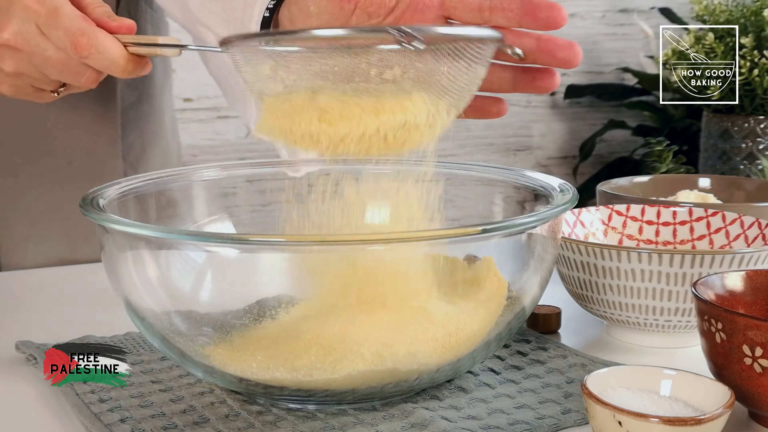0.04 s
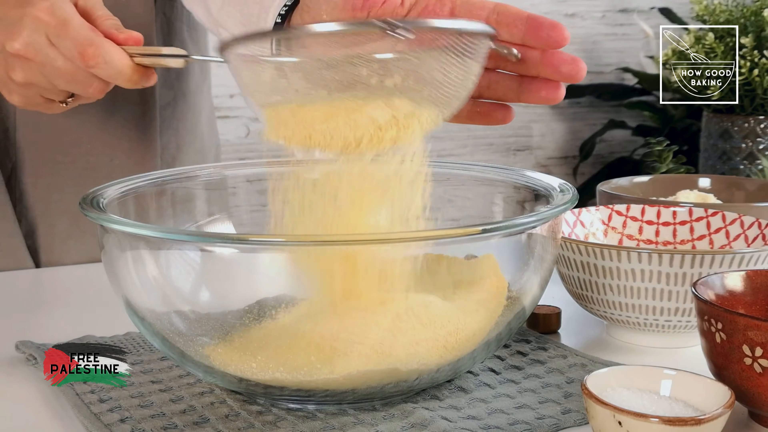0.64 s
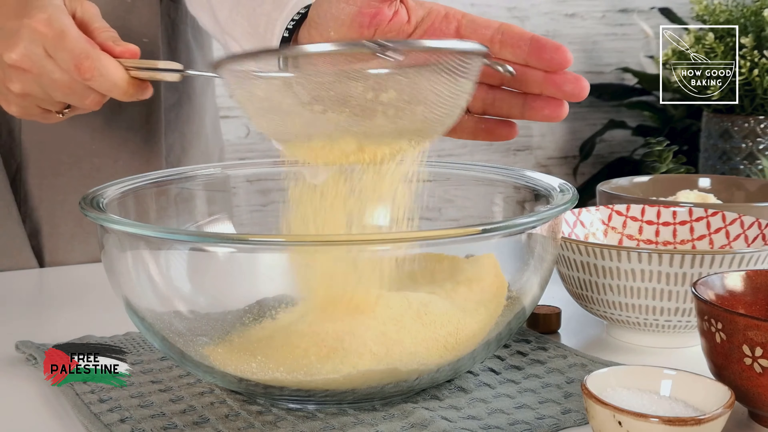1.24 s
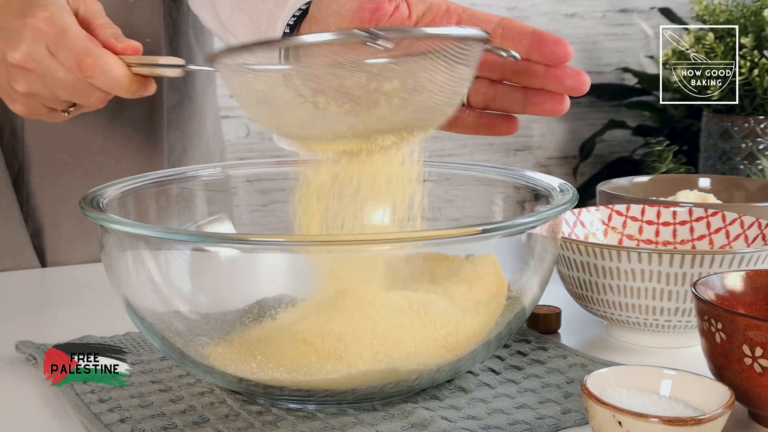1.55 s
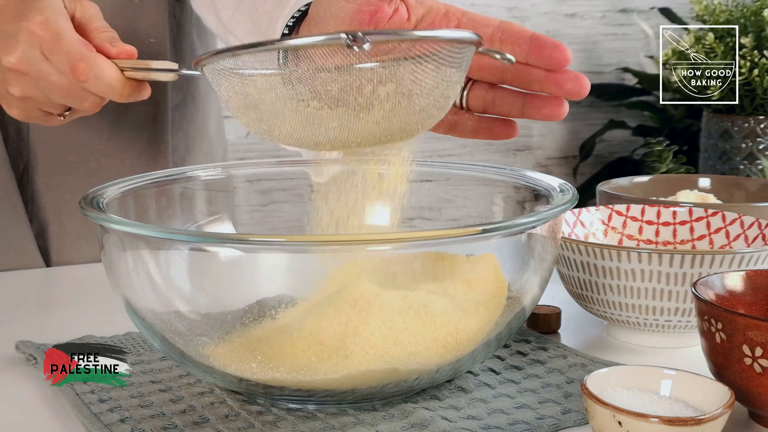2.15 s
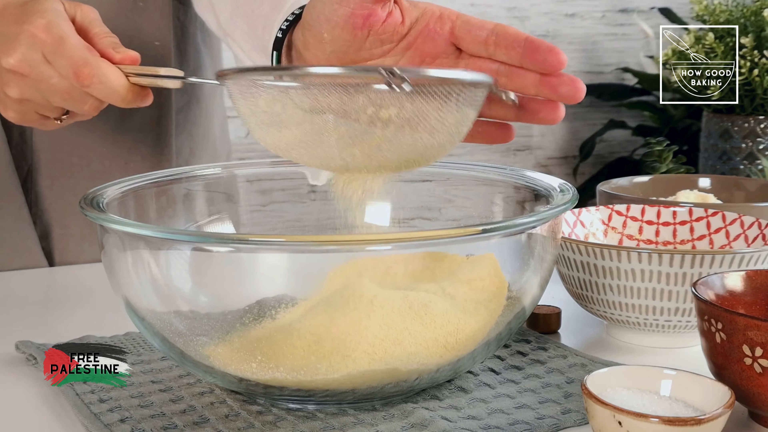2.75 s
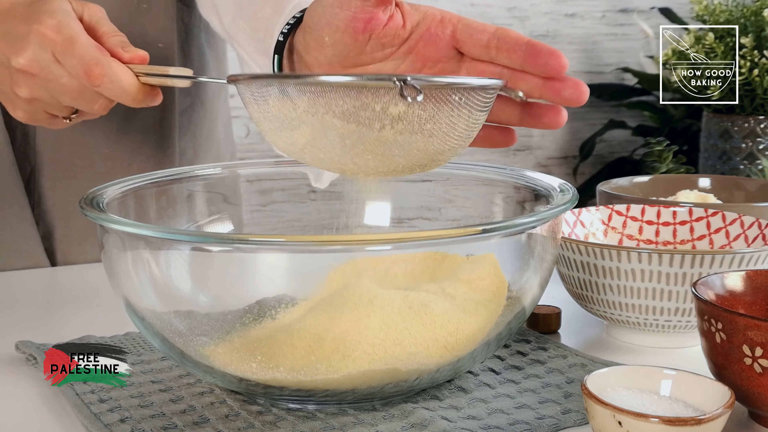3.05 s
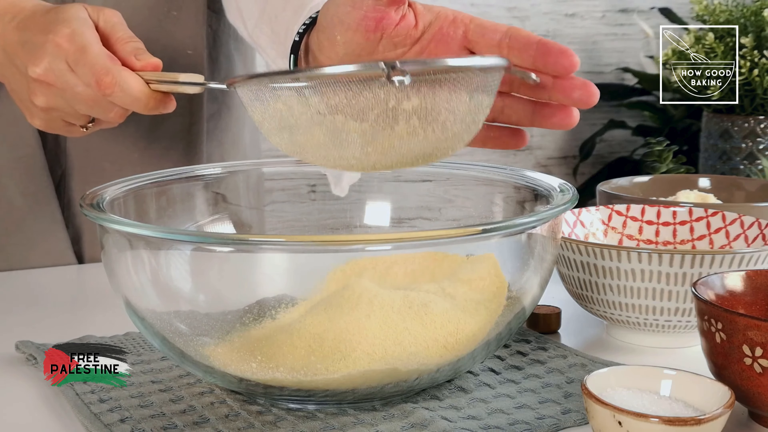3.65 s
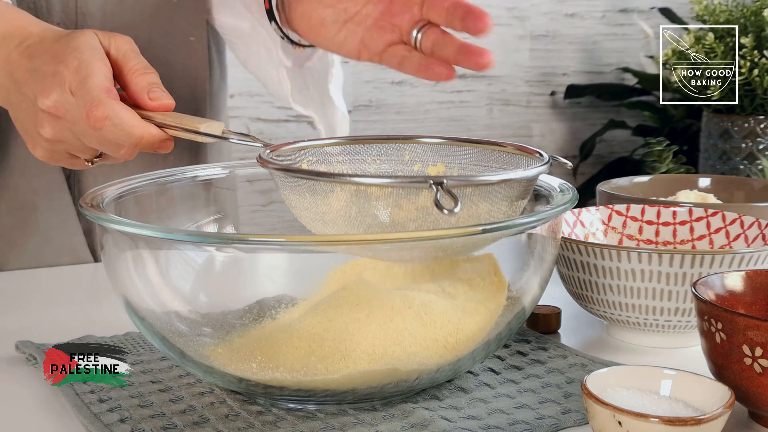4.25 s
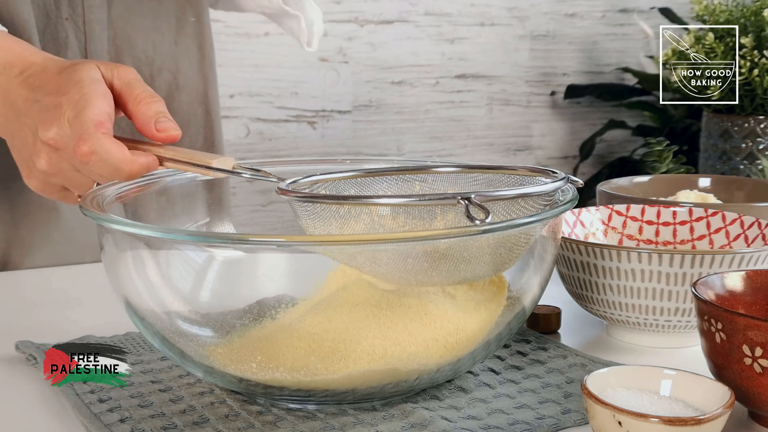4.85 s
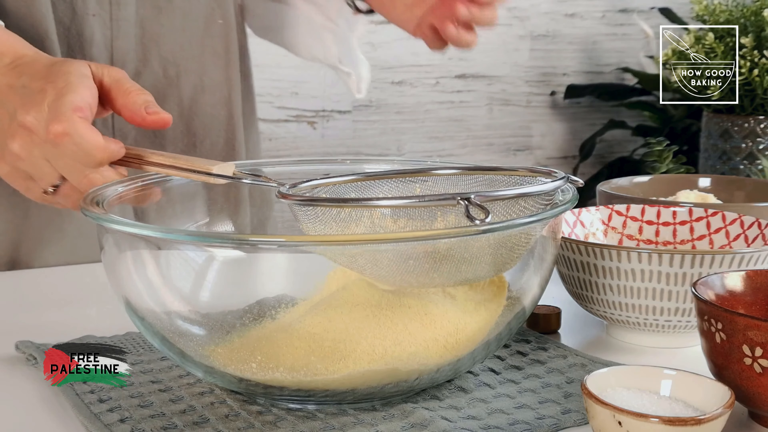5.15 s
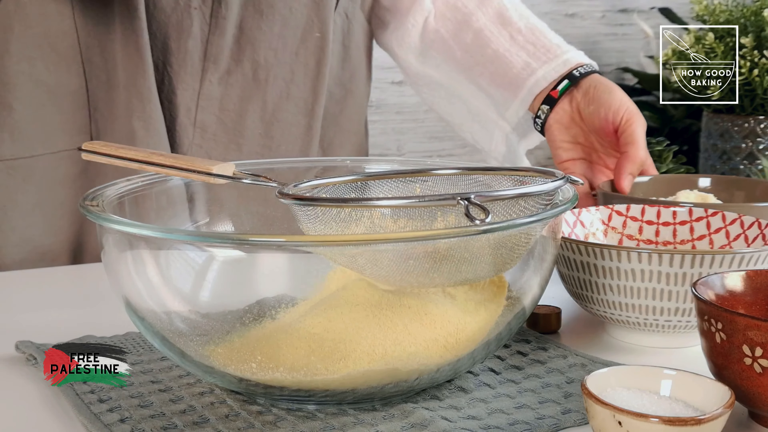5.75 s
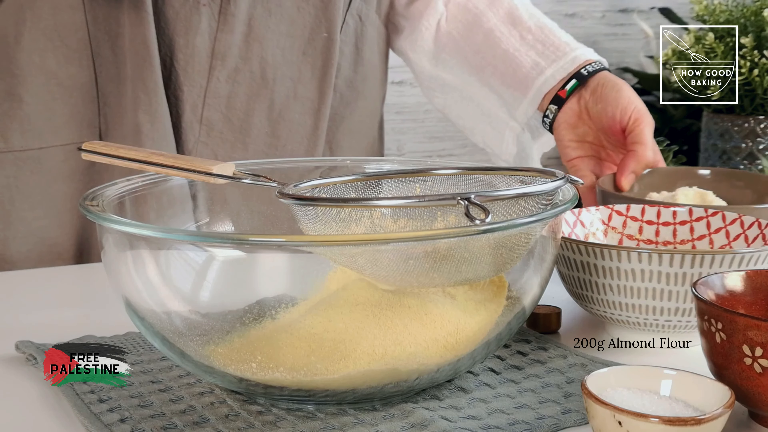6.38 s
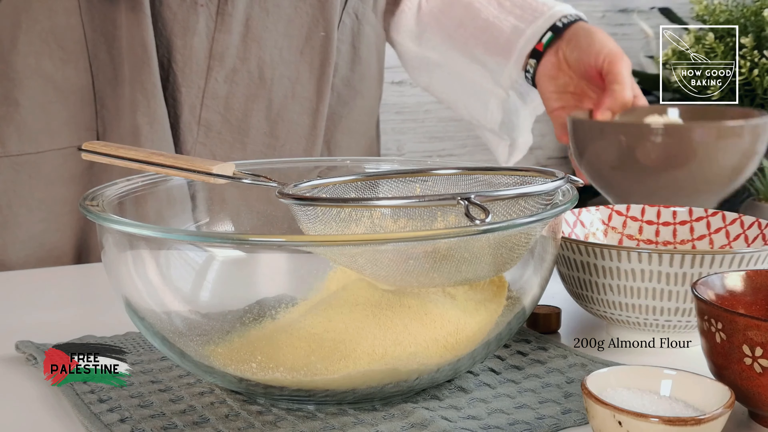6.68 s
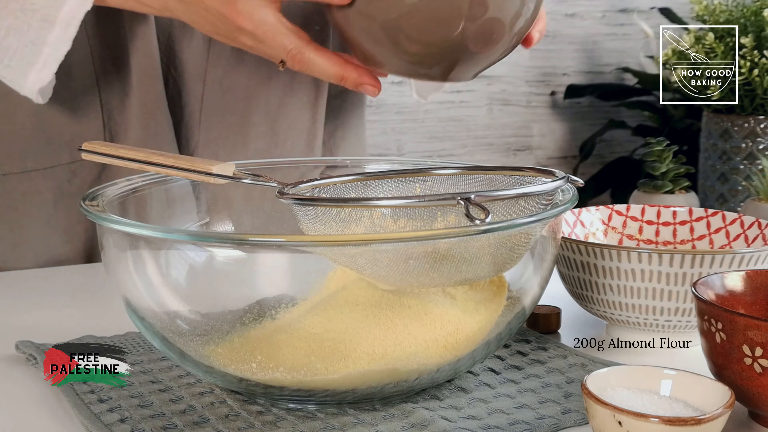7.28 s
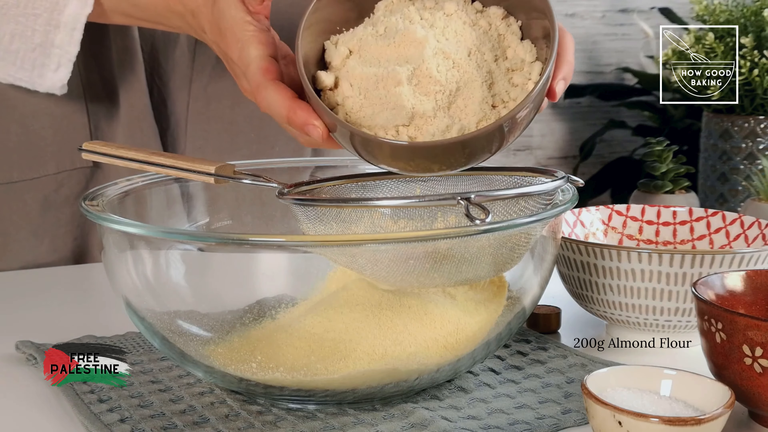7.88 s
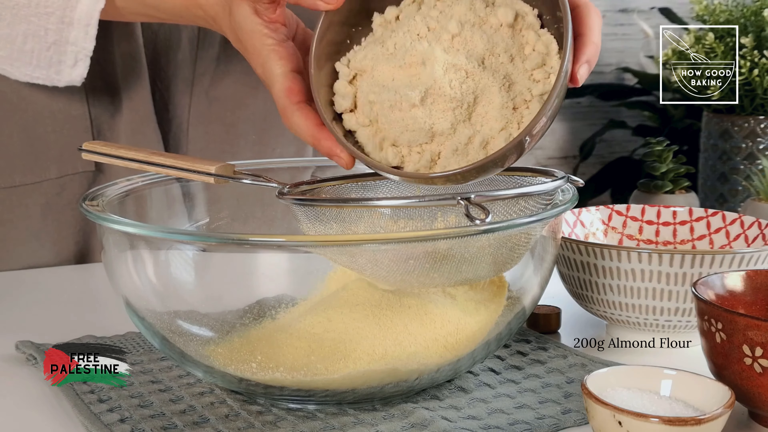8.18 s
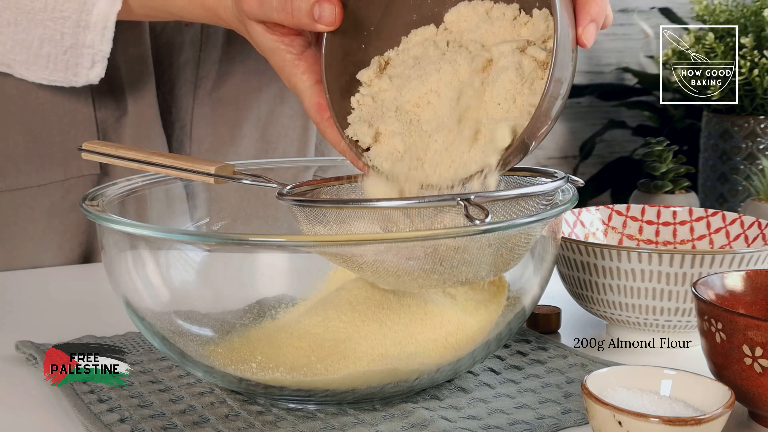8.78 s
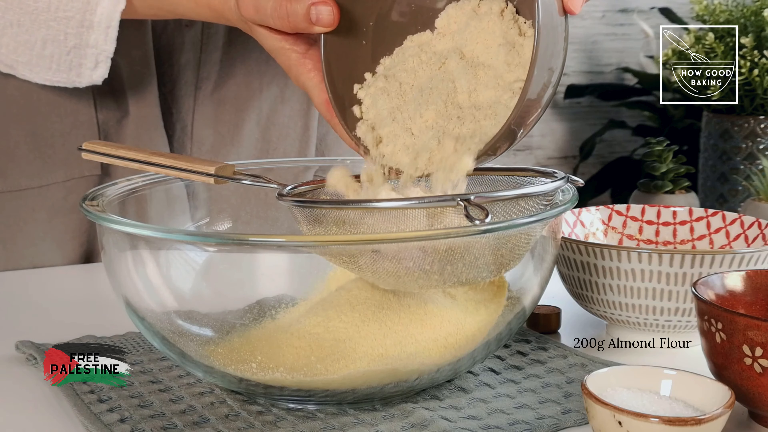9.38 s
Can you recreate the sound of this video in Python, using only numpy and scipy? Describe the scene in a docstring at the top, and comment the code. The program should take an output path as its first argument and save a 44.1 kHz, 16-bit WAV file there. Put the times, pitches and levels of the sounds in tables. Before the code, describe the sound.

A wire sieve of flour ticks softly against a palm, clinks onto a glass bowl, then ground almonds are tipped in.

```python
"""Soft pats and ticks, six a second: a wire sieve of flour swings against a palm, close to the microphone
in a quiet kitchen. Its loose mesh ticks in the rim, more freely as the flour runs out. The emptied sieve
clinks on the glass bowl and is laid across it; a sleeve brushes past, and a second bowl is picked up,
touches the sieve and tips ground almonds into it. An appliance hums faintly behind; the sound is
almost mono."""
import sys
import numpy as np
from scipy import signal
from scipy.fft import rfft, irfft, next_fast_len
from scipy.io import wavfile
from scipy.ndimage import map_coordinates

SR = 44100
rng = np.random.default_rng(int(sys.argv[2]) if len(sys.argv) > 2 else 0)


def to_wav(sig):
    """Store sig (one row per channel, or 1-D mono) as 16-bit WAV at the path in sys.argv[1].

    Samples outside -1..1 are clipped; the rate is SR.
    """
    pcm = np.clip(np.atleast_2d(sig), -1, 1) * 32767
    pcm = np.round(pcm).astype(np.int16)
    wavfile.write(sys.argv[1], SR, pcm.T)  # frames by channels


N = 415404

# Modes of the sieve's steel rim. Each row: frequency in Hz, relative level in dB, t60 in seconds.
RIM_MODES = [(7131, -5.5, .14), (7200, -6, .16), (7720, -3, .13), (7795, -2, .13), (7864, 0, .13),
             (8040, -3, .12), (8114, -2, .13), (8522, 1, .14), (9061, 3, .13), (11650, -11, .13),
             (15192, -8, .12)]
# Flour or meal running over the wires. Each row: frequency in Hz, relative level in dB.
POWDER_SPECTRUM = [(150, -14), (550, 6.5), (1200, -17), (2500, -6.5), (4000, -8.5), (5500, -8.5), (8000, 2),
                   (10200, -8), (13000, -10.5), (16000, -20.5)]
# Colour of the stereo side signal. Each row: frequency in Hz, relative gain in dB.
SIDE_SPECTRUM = [(30, -27), (130, -16), (300, -20.5), (1500, -14.5), (5000, -10.5), (8000, -15),
                 (15000, -38)]


def amp(db):
    return 10 ** (np.asarray(db) / 20)


def unit(x):
    """Scale to an rms of one."""
    return x / np.sqrt(np.mean(np.abs(x) ** 2) + 1e-20)


def along(points, hz):
    """Interpolate (Hz, value) points on a log frequency axis."""
    freqs, values = np.transpose(points)
    return np.interp(np.log(hz + 1), np.log(freqs), values)


def wobble(rate):
    """A smooth random curve, rate knots a second."""
    knots = rng.standard_normal(int(N * rate / SR) + 4)
    return map_coordinates(knots, [np.arange(N) * rate / SR])


def filtered(x, response):
    """Filter x by a gain given as a function of Hz."""
    size = next_fast_len(N + SR // 2)
    return irfft(rfft(x, size) * response(np.fft.rfftfreq(size, 1 / SR)), size)[..., :N]


def coloured(x, spectrum, size=4096):
    """Causal filter with a (Hz, dB) shape that keeps the power of white noise."""
    gain = unit(amp(along(spectrum, np.fft.rfftfreq(size, 1 / SR))))
    cepstrum = irfft(np.log(gain + 1e-6))
    cepstrum[1:size // 2] *= 2  # fold to minimum phase
    cepstrum[size // 2 + 1:] = 0
    return signal.oaconvolve(x, irfft(np.exp(rfft(cepstrum))))[:N]


def add(track, start_s, sound):
    """Mix a sound into a track at start_s."""
    start = round(start_s * SR)
    sound = sound[max(-start, 0):max(N - start, 0)]
    track[max(start, 0):][:len(sound)] += sound


def bursts(rows, rise_s, grain_db=0, steep=1):
    """White bursts (start s, dB) that peak after rise_s; steep shortens them, grain_db adds grit."""
    rows, power = list(rows), np.zeros(N)
    for (start, db), peak_s in zip(rows, np.broadcast_to(rise_s, len(rows))):
        age = np.arange(int(10 * peak_s * SR) + 2) / (peak_s * SR)
        envelope = amp(db) * (age * np.exp(1 - age)) ** steep
        add(power, start, envelope ** 2)
    grit = unit(amp(grain_db * wobble(900)))
    return np.sqrt(power) * grit * rng.choice([-1, 1], N)


def ringing(modes, t, scatter_db, twin=0, detune=0):
    """Decaying modes at randomly scattered levels; an optional detuned twin makes each one beat."""
    hz, db, t60 = np.transpose(modes)[:, :, None]
    phase = 2 * np.pi * hz * t
    level = amp(db + scatter_db * rng.standard_normal(hz.shape) - 60 * t / t60)
    return np.sum(level * (np.sin(phase) - twin * np.sin(phase * (1 + detune))), axis=0)


def resonance(hz, centre_hz, width_hz):
    """Gain of one narrow peak, halved at width_hz to either side."""
    return 1 / (1 + ((hz - centre_hz) / width_hz) ** 2)


def room_tone():
    """Rumble and hiss of the quiet kitchen, as mid and side."""
    # Each row: frequency in Hz, relative level in dB.
    air_spectrum = [(12, -47), (20, 0.5), (88, -14), (145, -18), (167, -24), (197, -12.5), (292, -17),
                    (375, -20), (469, -19), (1050, -27), (1390, -28.5), (2370, -34), (5780, -35.5),
                    (6650, -35.5), (15800, -39.5)]
    top_hz = 15850
    noise = rng.standard_normal((2, N))
    air = unit(filtered(noise, lambda hz: amp(along(air_spectrum, hz)) * (hz < top_hz)))
    mid = amp(-60 + .56 * wobble(7.6)) * air[0]
    side = filtered(amp(-54.5) * air[1], lambda hz: amp(along(SIDE_SPECTRUM, hz)))
    return mid, side


def appliance():
    """Wavering hum lines and a thin high whine in the background."""
    # Each row: frequency in Hz, rms level in dB.
    hum_lines = [(60, -74), (147, -79.5), (295.5, -74.5), (1357, -76)]
    hum, t = np.zeros(N), np.arange(N) / SR
    for hz, db in hum_lines:
        level = np.sqrt(2) * amp(db + .8 * wobble(3))
        hum += level * np.sin(2 * np.pi * hz * t + .8 * wobble(3))
    whine = filtered(rng.standard_normal(N), lambda hz: resonance(hz, centre_hz=6660, width_hz=130))
    return hum + amp(-80) * unit(whine)


def kitchen_echo(x):
    """A short diffuse echo reaches the microphone 4 ms late; its treble dies first."""
    # Each row: frequency in Hz, t60 in seconds.
    decay_times = [(200, 0.72), (2000, 0.55), (8000, 0.34), (15000, 0.13)]
    hz, t, noise = signal.stft(rng.standard_normal(SR // 2), SR, nperseg=256)
    decay = amp(-60 * t / along(decay_times, hz)[:, None])
    _, tail = signal.istft(noise * decay, SR, nperseg=256)
    response = np.pad(tail / np.linalg.norm(tail), (int(.004 * SR), 0))
    return signal.oaconvolve(x, response)[:N]


def sleeve():
    """Cloth slides on cloth in uneven catches as the palm withdraws and as the bowl is lifted."""
    # Each row: time in seconds, level in dB.
    brushing = [(3.8, -92), (4.05, -70.5), (4.42, -68.5), (4.6, -100), (6.75, -95), (6.92, -68),
                (7.02, -64.5), (7.14, -64.5), (7.25, -79), (7.45, -70.5), (7.7, -71), (7.85, -95)]
    # Each row: frequency in Hz, relative level in dB.
    cloth_spectrum = [(150, -12), (600, 2), (1500, -1.5), (3000, -5.5), (6000, -8), (9000, -10),
                      (15000, -28)]
    level_db = np.interp(np.arange(N) / SR, *np.transpose(brushing)) + 1.5 * wobble(60)
    return coloured(amp(level_db) * rng.standard_normal(N), cloth_spectrum)


def finger_rubs():
    """Short catches of skin on glaze excite one narrow resonance of the second bowl."""
    # Each row: start in seconds, level in dB.
    catches = [(5.52, -72), (6.39, -76), (6.5, -75), (6.61, -76), (7.34, -77), (8.63, -74)]
    friction = bursts(catches, rise_s=.025, grain_db=1)
    return filtered(friction, lambda hz: unit(resonance(hz, centre_hz=4330, width_hz=83)))


def second_bowl():
    """The bowl bumps as it is picked up, scrapes on the rim and sheds lumps of meal on the mesh."""
    # Each row: start and time to peak in seconds, then thump, scrape and falling meal in dB.
    handling = [(5.617, 0.0061, -46.5, -77, -65.5), (5.633, 0.022, -51.5, -68, -74),
                (7.94, 0.015, -79, -72, -64), (7.987, 0.013, -71, -56, -58),
                (8.308, 0.015, -59, -55.5, -78), (8.43, 0.022, -64, -68, -58.5),
                (8.512, 0.015, -64.5, -80, -63.5), (8.641, .0014, -80, -46.5, -63),
                (9.23, 0.032, -69, -88, -70)]
    # Each row: frequency in Hz, width in Hz, relative level in dB.
    stoneware_modes = [(810, 220, 7), (1585, 240, 4.5), (2300, 230, 4.5), (2950, 170, 6), (3520, 250, 5.5),
                       (4630, 60, 4)]
    # Each row: frequency in Hz, relative level in dB.
    thump_spectrum = [(80, -6.5), (200, -11), (320, 5), (600, -0.5), (950, -5.5), (1500, -12), (4000, -26),
                      (15000, -69)]

    def body(hz):
        return unit(sum((-1) ** k * amp(db) * 1j * hz * width / (centre ** 2 - hz ** 2 + 1j * hz * width)
                        for k, (centre, width, db) in enumerate(stoneware_modes)))

    starts, rise_s, *levels = np.transpose(handling)
    thump, scrape, lumps = (bursts(zip(starts, db), rise_s, grain_db=1.5) for db in levels)
    return coloured(thump, thump_spectrum) + filtered(scrape, body) + coloured(lumps, POWDER_SPECTRUM)


def clinks():
    """The sieve or the second bowl strikes: the glass bowl and steel rim ring, the wires clash."""
    # Each row: start in seconds, glass ring in dB, brightness in Hz, longest glass t60 in seconds,
    # then rim ring, rim clash, mesh crack and knock in dB.
    contacts = [(4.444, -39, 16000, 0.77, -55, -37, -30, -62),
                (4.651, -52.5, 3600, 0.3, -72, -63, -66, -73),
                (4.815, -56.5, 3500, 0.15, -67.5, -58, -68, -73),
                (4.8494, -35.5, 8000, 0.23, -34.5, -29, -16.5, -39),
                (4.8524, -60, 7000, 0.27, -57, -19, -28, -44),
                (4.8648, -48.5, 3600, 0.55, -57, -31.5, -37, -57),
                (5.102, -31, 1390, 0.11, -80, -69, -78, -38.5),
                (7.8286, -54.5, 3000, 0.24, -79, -32.5, -47, -47.5),
                (7.999, -54.5, 3100, 0.26, -62, -49, -66, -80),
                (8.6423, -55, 3570, 0.044, -80, -60, -70, -76)]
    # Each row: frequency in Hz, relative level in dB, t60 in seconds.
    glass_modes = [(463, -12.5, .9), (1213, -8, 1.2), (2234, -7.5, .75), (3494, -2, .22), (4931, 3.5, .19),
                   (6541, 0, .26), (6826, -10, .2), (8277, -2, .19), (10140, -10, .22), (12100, -5, .16),
                   (13180, -13, .16), (14150, -14, .17)]
    # Three impact spectra. Each row: frequency in Hz, relative level in dB.
    clash_spectrum = [(200, -26), (1000, -13.5), (4000, -15), (6500, -11.5), (7900, 2.5), (8800, 8.5),
                      (9700, -12.5), (12000, -18), (14500, -13), (16500, -20)]
    crack_spectrum = [(200, -22), (1000, -10.5), (4000, -12), (7000, -2.5), (9000, -3), (10200, -6.5),
                      (11800, -1), (14600, 2), (15600, -21), (16500, -27)]
    knock_spectrum = [(80, -14), (300, -13), (540, 9), (740, 4.5), (1200, -14), (1700, -23), (3000, -19.5),
                      (6000, -38), (15000, -63)]
    ring, t = np.zeros(N), np.arange(int(.8 * SR)) / SR
    # the sieve settles against the glass and stifles the longest notes
    settling = amp(-170 * np.maximum(t - .19, 0))
    for start, glass_db, bright_hz, longest_s, rim_db, _, _, knock_db in contacts:
        # a soft contact reaches only the low modes
        modes = [(hz, db - 10 * np.log10(1 + (hz / bright_hz) ** 8), min(t60, longest_s))
                 for hz, db, t60 in glass_modes]
        glass = ringing(modes, t, scatter_db=.7, twin=.2, detune=.003)
        add(ring, start, amp(glass_db) * settling * glass)
        # the weight of a knock flexes the whole bowl in its lowest mode
        add(ring, start, amp(knock_db + 1.2) * ringing(modes[:1], t, scatter_db=2))
        add(ring, start, amp(rim_db) * ringing(RIM_MODES, t, scatter_db=1.5))
    starts, *_, clash_db, crack_db, knock_db = np.transpose(contacts)
    clash = bursts(zip(starts, clash_db), rise_s=.001)
    crack = bursts(zip(starts, crack_db), rise_s=.00066)
    rattle = bursts(zip(starts, crack_db - 22), rise_s=.006, grain_db=3)
    knock = bursts(zip(starts, knock_db), rise_s=.0024)
    return (ring + coloured(clash, clash_spectrum) + coloured(crack + rattle, crack_spectrum)
            + coloured(knock, knock_spectrum))


def palm_pats(starts):
    """The rim meets the palm: skin gives a short slap, the flesh behind it a softer thud."""
    # Firmness of the pats. Each row: time in seconds, level in dB.
    push = [(.1, -64.5), (.55, -56.5), (1.35, -56), (1.95, -49.5), (2.27, -47.5), (2.45, -52), (2.9, -58),
            (3.7, -68)]
    # Spectra of skin and flesh. Each row: frequency in Hz, relative level in dB.
    slap_spectrum = [(200, -3), (1000, -18), (1600, -1), (2400, 1), (3300, -16), (8000, -6), (15000, -20)]
    thud_spectrum = [(60, 5), (200, -5.5), (500, -1.5), (1000, -18.5), (2000, -13.5), (3000, -19.5),
                     (8000, -6.5), (15000, -33)]
    push_db = np.interp(starts, *np.transpose(push))
    slap = bursts(zip(starts, push_db - 3), rise_s=.0012)
    thud = bursts(zip(starts, push_db + 4.5), rise_s=.003)
    return coloured(slap, slap_spectrum) + coloured(thud, thud_spectrum)


def loose_mesh(ticks):
    """At each tick (start s, dB) the mesh snaps, the wires chatter and the rim sings faintly."""
    # Each row: frequency in Hz, relative level in dB.
    mesh_spectrum = [(300, -46), (2300, -27.5), (3100, -19), (3850, -9), (4900, -16), (6200, -13.5),
                     (7000, -3), (7700, 1), (9000, -4.5), (10600, -12.5), (12100, -3), (13800, -2),
                     (15000, -11), (16500, -31)]
    snaps = bursts(ticks, rise_s=.0009, grain_db=2, steep=1.8)
    chatter = bursts([(start, db - 15) for start, db in ticks], rise_s=.0026)
    rim = ringing(RIM_MODES[:8], np.arange(SR // 5) / SR, scatter_db=1.5)
    singing = signal.oaconvolve(snaps, rim / np.linalg.norm(rim))[:N]
    return coloured(snaps + chatter, mesh_spectrum) + amp(-19) * singing


def sifting():
    """Each swing slides flour, ticks twice at the turn, then pats the palm and snaps the mesh."""
    # Each row: turn of the swing in seconds, touch of the palm in seconds, snap of the mesh in dB.
    strokes = [(0.081, .115, -64), (0.234, .2675, -58), (0.388, 0.4195, -59), (.539, 0.568, -54),
               (.685, .716, -48), (.835, 0.872, -40.5), (.987, 1.028, -40.5), (1.135, 1.1798, -37),
               (1.289, 1.331, -39.5), (1.439, 1.4875, -28.5), (1.591, 1.642, -24), (1.745, 1.798, -29.5),
               (1.897, 1.951, -34.5), (2.052, 2.112, -30), (2.2093, 2.274, -29), (2.3715, 2.432, -36),
               (2.533, 2.601, -34), (2.7008, 2.76, -43.5), (2.8617, 2.9285, -30.5), (3.0255, 3.0925, -28),
               (3.1912, 3.25, -27), (3.352, 3.392, -37), (3.5156, 3.54, -34.5), (3.6778, 3.706, -74)]
    # The mesh flies longer and lands harder as it gets lighter.
    # Each row: time in seconds, flight in seconds, level of the second tick in dB.
    rebounds = [(.3, .009, -63), (.85, 0.0077, -46), (1.42, .002, -43.5), (1.9, 0.0088, -34.5),
                (2.4, 0.013, -34.5), (2.9, .0178, -35.5), (3.52, .0135, -34.5), (3.68, .008, -54)]
    empty_s, snap_delay_s = 2.8, .01055  # flour has run through; lag from palm to snap
    turn_s, palm_s, snap_db = np.transpose(strokes)
    load = np.clip(1 - turn_s / empty_s, 0, 1)
    tick_db = -37 - 31.5 * load ** 6.2  # only a deep layer of flour muffles the first tick
    times, *columns = np.transpose(rebounds)
    flight_s, rebound_db = (np.interp(turn_s, times, column) for column in columns)
    lead_db = (tick_db + snap_db) / 2
    mesh = loose_mesh([*zip(turn_s, tick_db),
                       *zip(turn_s + flight_s, rebound_db),
                       *zip(palm_s, lead_db - 13.5),  # two lesser ticks lead up to the snap
                       *zip(palm_s + snap_delay_s / 2, lead_db - 7),
                       *zip(palm_s + snap_delay_s, snap_db)])
    # the slide starts just ahead of the turn and fades as the flour runs out
    slides = zip(turn_s - .0069, -60 - 16.5 * (1 - load) ** 2)
    extra_slide = (3.4, -66)  # one faint slide of flour during the final swings: seconds, dB
    flour = bursts([*slides, extra_slide], rise_s=.03, grain_db=2.5)
    return mesh + coloured(flour, POWDER_SPECTRUM) + palm_pats(palm_s)


def scene():
    """The work is close to the microphone and centred; only the room gives a little width."""
    near = sifting() + clinks() + second_bowl() + sleeve()
    mid, side = room_tone()
    mid = mid + appliance() + near + finger_rubs() + amp(-13) * kitchen_echo(near)
    side = side + filtered(kitchen_echo(near), lambda hz: amp(along(SIDE_SPECTRUM, hz) - 33))
    return np.array([mid + side, mid - side])


def record(dry):
    """The recorder keeps nothing above its band limit."""
    top_hz = 16300
    return filtered(dry, lambda hz: 1 / np.sqrt(1 + (hz / top_hz) ** 160))


dry = scene()
out = record(dry)
to_wav(out)
```